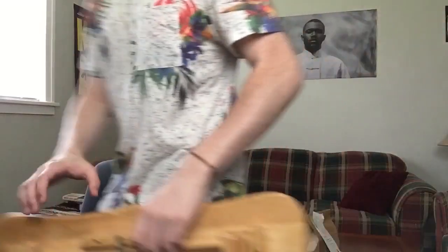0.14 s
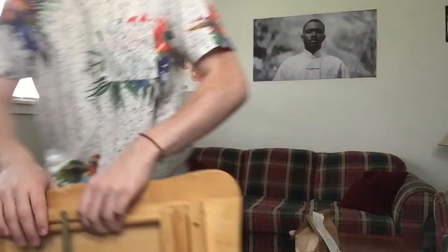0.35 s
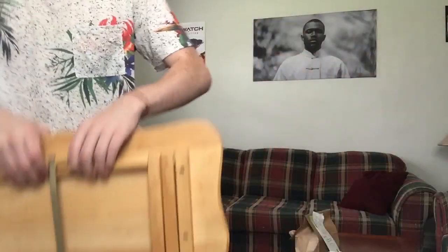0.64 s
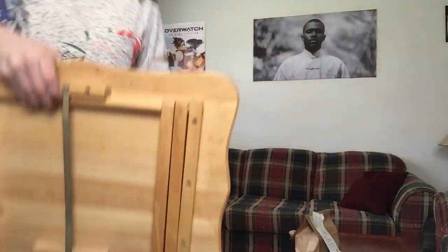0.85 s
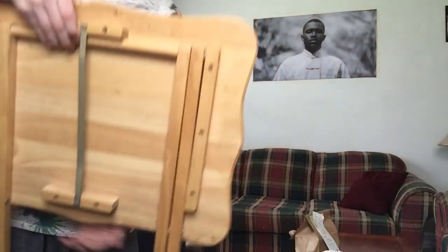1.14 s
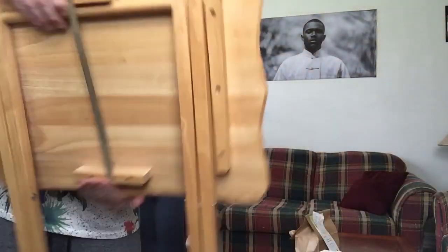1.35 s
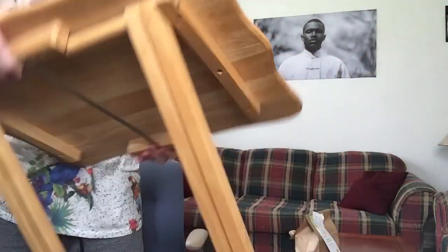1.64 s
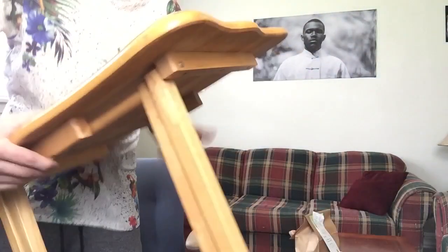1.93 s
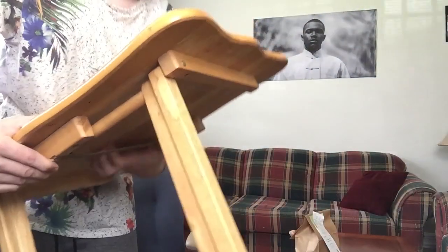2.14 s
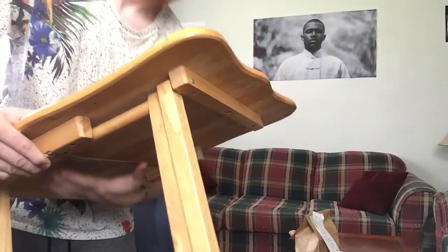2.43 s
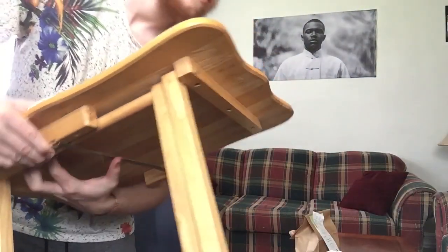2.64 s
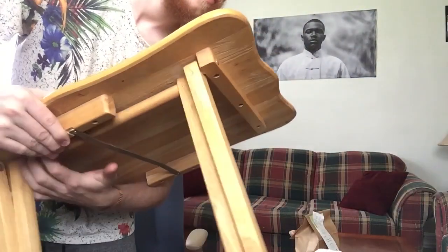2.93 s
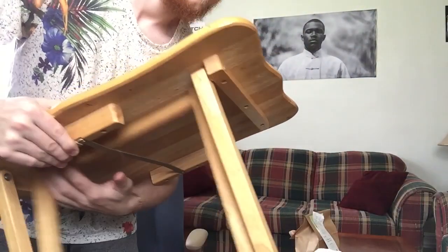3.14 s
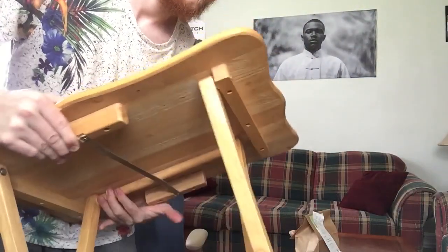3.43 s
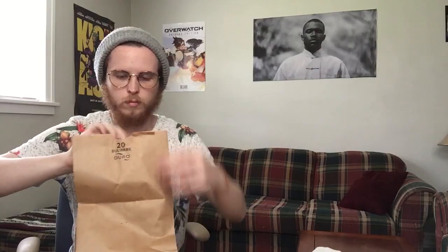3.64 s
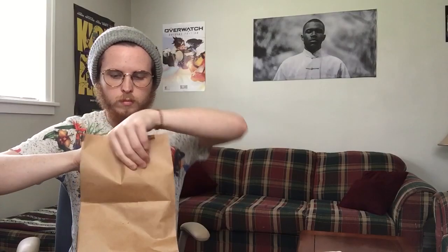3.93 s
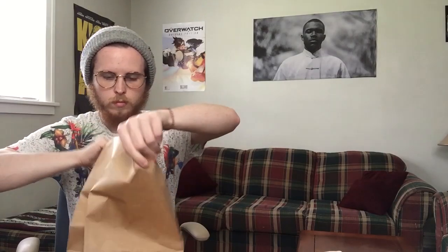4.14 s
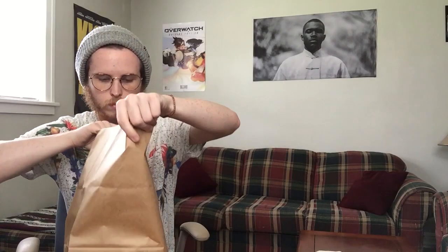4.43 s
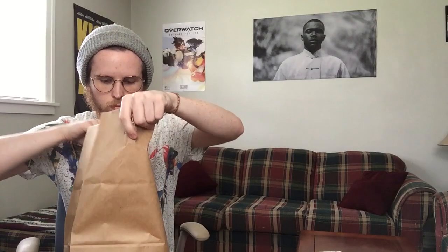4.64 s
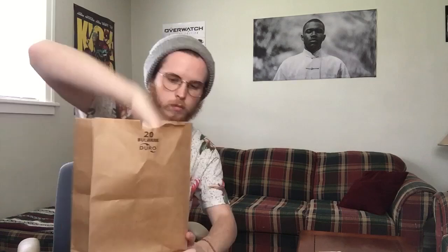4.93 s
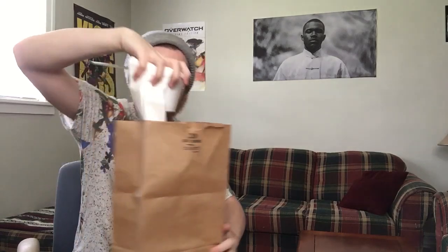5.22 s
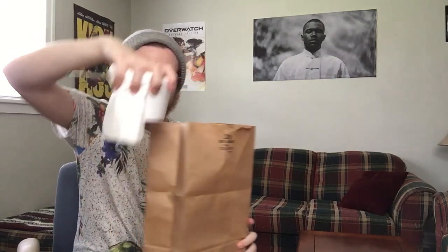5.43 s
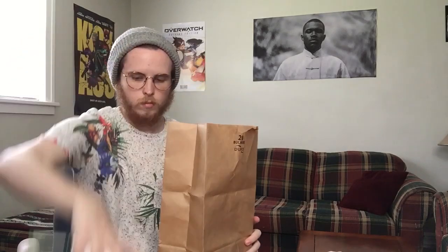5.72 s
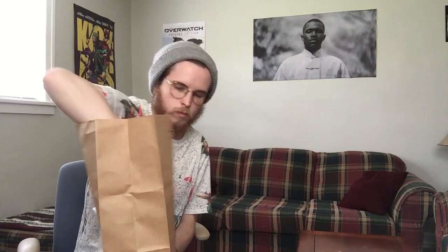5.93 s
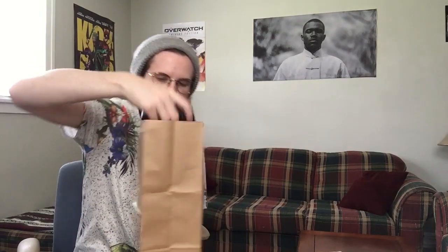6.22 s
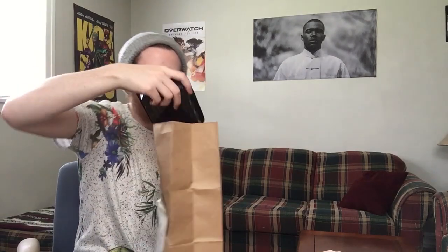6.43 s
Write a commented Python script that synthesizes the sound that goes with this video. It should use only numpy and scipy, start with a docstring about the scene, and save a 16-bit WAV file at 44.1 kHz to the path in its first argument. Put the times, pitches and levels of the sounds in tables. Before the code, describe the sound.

For the first second or so, a wooden folding table is lifted with soft knocks, dull bumps and a light rattle of loose legs. Its hinges give faint, short squeaks from about 1.4 to 3 seconds. The knocks then grow, with a brief rub of palms on wood, into a loud clatter that stops abruptly at 3.5 seconds. A paper bag takes over at once, rustling and then snapping and crinkling loudest between 4 and 4.4 seconds, with low thumps from inside. Softer crackles follow, and the rustle picks up again at 5 seconds. A box slides along the paper with a smooth hiss around 5.3 seconds. From 5.7 to about 6.5 seconds, boxes tap hollowly and slide amid more rummaging. Everything sounds close, in a small furnished room with a faint electrical hum and a low wash of air.

```python
"""A paper bag is pulled open and rummaged through: creases buckle and snap over a dense rustle,
while boxes slide, knock and bump inside. Before it, a wooden folding table is lifted and opened:
friction makes its hinges squeak, and impacts of the legs excite the modes of the top.
The clatter stops abruptly as the scene changes to the bag. Both sound in a small furnished room
with mains hum and a low murmur of air."""
import sys
import numpy as np
from scipy import signal
from scipy.io import wavfile

SR = 44100
rng = np.random.default_rng(int(sys.argv[2]) if len(sys.argv) > 2 else 0)


def bounce(signal):
    """Save signal as a 16-bit WAV file at the path given by the first command-line argument."""
    frames = np.transpose(np.atleast_2d(signal))
    limited = np.clip(frames, -1, 1)
    pcm = np.round(limited * 32767).astype(np.int16)
    wavfile.write(sys.argv[1], SR, pcm)


N = 290619

TABLE_SCENE = np.arange(N) < 3.527 * SR   # true for the table, false for the bag
EDGES = 25 * 2 ** np.arange(0, 9.6, .5)   # half-octave bands, Hz
CENTRES = np.sqrt(EDGES[1:] * EDGES[:-1])
BANK = [signal.butter(2, pair, "band", fs=SR, output="sos") for pair in zip(EDGES, EDGES[1:])]
OCTAVES_UP = np.log2(np.maximum(CENTRES, 500) / 1500)   # axis of spectral tilt, flat below 500 Hz

# normal modes of the table top: pitch_hz, gain_db, t60_s
TOP_MODES = [(286.6, 5, 0.11), (362, 11, 0.045), (423.5, 8, 0.073), (500, 2, 0.057), (562, 1.5, 0.093),
             (649, 11, 0.023), (700, -1.5, 0.16), (821, 6.5, 0.064), (1031, 9, 0.035), (1330, 20.5, 0.009),
             (2257, 16, 0.016), (3000, 8, 0.0075)]
# relative spectral density of crumpling paper: frequency_hz, level_db
PAPER_SPECTRUM = [(88, -28), (150, -2.5), (386, 6), (883, 3), (1380, 5.5), (2860, 0), (7210, -13),
                  (11000, -30), (15000, -28)]
# boxes striking bag and table: start_s, peak_db, pitch_hz, second_pitch_hz
BOX_TAPS = [(5.696, -14, 1660, 2860), (5.898, -21.5, 238, 500), (5.908, -18, 414, 706),
            (5.988, -20.5, 670, 1090), (6.012, -26.5, 470, 950), (6.125, -16, 687, 1930),
            (6.168, -29, 724, 2570), (6.321, -24, 1720, 2170), (6.378, -10.5, 2180, 730)]
# large creases giving way: start_s, peak_db, panel_pitch_hz
CREASES = [(3.558, -29, 2450), (3.659, -14.5, 2930), (3.765, -31, 2100), (3.863, -30.5, 620),
           (3.877, -31, 1330), (3.948, -27, 1780), (4.004, -17.5, 2470), (4.021, -19.5, 2830),
           (4.076, -6.5, 1700), (4.099, -5.5, 2870), (4.106, -13, 3000), (4.127, -12.5, 2670),
           (4.13, -10.5, 317), (4.151, -13, 6000), (4.176, -3.5, 1500), (4.243, -6.5, 3270),
           (4.249, -11, 3220), (4.321, -17, 7100), (4.334, -16, 3030), (4.393, -11, 1320),
           (4.402, -10, 1630), (4.564, -28.5, 1270), (4.602, -46, 1780), (4.704, -29, 673),
           (4.786, -39.5, 670), (4.841, -26, 685), (4.879, -31, 675), (4.894, -27, 655), (4.921, -35, 2360),
           (4.935, -25.5, 1860), (4.994, -24.5, 1520), (5.026, -22.5, 627), (5.082, -25, 1730),
           (5.154, -28.5, 753), (5.19, -20.5, 411), (5.833, -42, 1290), (5.961, -28, 2300),
           (6.102, -24.5, 1980), ]


def from_db(db):
    """Amplitude ratio of a level in decibels."""
    return np.exp(np.asarray(db) * np.log(10) / 20)


def rms_one(x):
    """Normalisation to unit rms."""
    return x / np.sqrt(np.mean(x ** 2) + 1e-20)


def per_band(points):
    """A spectrum interpolated at the band centres, in log frequency."""
    hz, db = np.transpose(points)
    return np.interp(np.log(CENTRES), np.log(hz), db)


def coloured(x, gains):
    """Filter-bank shaping; alternating signs let neighbouring bands add at their common edge."""
    return sum(g * (-1) ** k * signal.sosfilt(sos, x) for k, (g, sos) in enumerate(zip(gains, BANK)))


def drift(corner_hz):
    """Slow random modulation: low-passed noise of unit rms."""
    r = np.exp(-2 * np.pi * corner_hz * 40 / SR)
    slow = signal.lfilter([1], [1, -2 * r, r * r], rng.standard_normal(N // 40 + 2002))[2000:]
    return np.interp(np.arange(N) / 40, np.arange(len(slow)), rms_one(slow))


def ring(x, hz, t60):
    """Damped resonator: a unit impulse starts a decaying sine of unit amplitude."""
    r, w = from_db(-60 / (t60 * SR)), 2 * np.pi * hz / SR
    return signal.lfilter([0, np.sin(w)], [1, -2 * r * np.cos(w), r * r], x + 1e-18)


def grains(per_s, spread_db, clump_db):
    """Shot noise of unit rms: random impulses, uneven in size and modulated into clumps."""
    sizes = from_db(spread_db * np.minimum(rng.exponential(1, N), 5)) * rng.choice([-1, 1], N)
    return rms_one(sizes * (rng.random(N) < per_s / SR) * from_db(clump_db * drift(46.4)))


def hump(middle_s, length):
    """Gaussian envelope."""
    return np.exp(-(2 * (np.arange(N) / SR - middle_s) / length) ** 2)


def gesture(s, length, rise_s, fall_s, growth_db_per_s=0):
    """Envelope that reaches 1 at s, is sustained, then decays; rise and fall are times for 40 dB."""
    corners = s + np.array([-3 * rise_s, 0, length, length + 3 * fall_s])
    first, last = np.clip((corners[[0, -1]] * SR).astype(int), 0, N)
    gain, end_db = np.zeros(N), growth_db_per_s * length
    level_db = np.interp(np.arange(first, last) / SR, corners, [-120, 0, end_db, end_db - 120])
    gain[first:last] = from_db(level_db)
    return gain


def fading(blows, fade_s):
    """Envelope that jumps at each (start_s, level_db) and decays exponentially."""
    steps = np.zeros(N)
    for s, db in blows:
        steps[round(s * SR)] = from_db(db)
    return signal.lfilter([1], [1, -np.exp(-1 / (fade_s * SR))], steps + 1e-18)


def air():
    """Ambient noise: a broad spectrum whose bands waver, with a few narrow resonances."""
    # relative spectral density of the air: frequency_hz, level_db
    spectrum = [(24, -54), (40, -7), (113, -6.5), (169, -4.5), (373, -8), (560, -14), (1170, -8),
                (1260, -16), (2390, -13.5), (2850, -24.5), (6000, -31.5), (15000, -46)]
    # resonances in the room noise: pitch_hz, width_hz, level_db
    resonances = [(370, 81, -59), (975, 46, -68), (1173, 9, -70)]
    white = rng.standard_normal((2, N))
    waver_db = np.where(CENTRES < 600, 3.9, 1.5)
    murmur = sum(from_db(db + waver_db[k] * drift(4.8)) * signal.sosfilt(BANK[k], white[k % 2])
                 for k, db in enumerate(per_band(spectrum)))
    tones = sum(from_db(db) * rms_one(ring(white[0, ::-1], hz, 3.14 / width))
                for hz, width, db in resonances)
    return from_db(-57) * rms_one(murmur) + tones


def mains_hum(pitch_hz=120.5, level_db=-58.5):
    """A machine on the mains radiates a pure tone, slightly modulated in amplitude."""
    tone = np.sqrt(2) * np.sin(2 * np.pi * pitch_hz * np.arange(N) / SR)
    return from_db(level_db + 2.1 * drift(5.7)) * tone


def room(x, t60_s=0.37, reverb_db=-16, wall_cut_hz=7000):
    """Reverberation: diffuse reflections, dulled by the walls, follow the direct sound after 4 ms."""
    t = np.arange(SR // 2) / SR
    tail = rng.standard_normal(len(t)) * from_db(-60 * t / t60_s) * (t > .004)
    tail = signal.sosfilt(signal.butter(1, wall_cut_hz, fs=SR, output="sos"), tail)
    return x + from_db(reverb_db) * signal.fftconvolve(x, tail / np.sqrt(np.sum(tail ** 2)))[:N]


def bumps():
    """Soft impacts excite only low frequencies; the bag reaches deeper than the board."""
    # the table against the body, then the contents in the bag: start_s, level_db
    blows = [(0.041, -42.5), (0.173, -40), (0.518, -42), (0.621, -42.5), (1.162, -41.5), (4.105, -40),
             (4.179, -32), (4.399, -41.5), (4.998, -44.5), (5.894, -37), (6.127, -42)]
    white = rng.standard_normal(N)
    bands = (signal.butter(2, [low_hz, 240], "band", fs=SR, output="sos") for low_hz in (105, 45))
    board, bag = (rms_one(signal.sosfilt(band, white)) for band in bands)
    return fading(blows, fade_s=0.045) * np.where(TABLE_SCENE, board, bag)


def table_top(x):
    """Modal superposition: the top responds as a sum of damped resonators of alternating sign."""
    return sum(from_db(db) * ring(x, hz, t60) * (-1) ** k for k, (hz, db, t60) in enumerate(TOP_MODES))


def leg_rattle():
    """Forced vibration: many small impacts of the loose legs drive the top."""
    # jolts to the legs, the longest being the carrying: start_s, length_s, level_db
    jolts = [(0.0, 0.026, -33), (0.038, 0.18, -41), (0.525, 0.04, -31), (0.666, 1.7, -61),
             (2.12, 0.068, -37), (3.226, 0.033, -25), (3.34, 0.0059, -16.5), (3.398, 0.082, -15.5)]
    shaking = sum(from_db(db) * gesture(s, length, rise_s=0.11, fall_s=0.017) for s, length, db in jolts)
    impacts = signal.lfilter([.15], [1, -.85], grains(1000, spread_db=0.5, clump_db=4))
    return from_db(-13) * table_top(impacts * shaking) / np.std(table_top(impacts))


def palm_rubs(hiss):
    """Sliding friction: palms hiss as they move over the varnish."""
    # strokes of the palms: start_s, length_s, level_db
    strokes = [(0.524, 0.12, -64.5), (3.172, 0.099, -47.5), (3.323, 0.025, -41), (3.392, 0.062, -44)]
    return hiss * sum(from_db(db) * gesture(s, length, rise_s=0.099, fall_s=0.011)
                      for s, length, db in strokes)


def hinge_squeaks(grit, hiss):
    """Stick-slip friction: uneven slips excite one pitch per rub, and the pin colours the hiss."""
    # rubs in the hinges: middle_s, length_s, tone_db, pitch_hz, hiss_db
    rubs = [(0.794, 0.1, -63, 1650, -63.5), (1.42, 0.047, -46, 2240, -50.5), (2.137, 0.068, -48, 1850, -50),
            (2.248, 0.099, -43.5, 285, -65), (2.377, 0.092, -55, 1810, -66),
            (2.598, 0.095, -51.5, 1820, -65), (2.924, 0.031, -61, 3060, -54.5),
            (3.313, 0.0068, -39, 3530, -47), (3.408, 0.042, -61, 5150, -45)]
    pin_hiss = hiss + from_db(-8) * rms_one(ring(grit, hz=3700, t60=0.014))
    out, slips = np.zeros(N), grains(1500, spread_db=0, clump_db=0.5)
    for s, length, tone_db, hz, hiss_db in rubs:
        squeak = rms_one(ring(ring(slips, hz, 25 / hz), hz, 25 / hz))
        out += hump(s, length) * (from_db(tone_db) * squeak + from_db(hiss_db) * pin_hiss)
    return out


def knocks(chatter_s=0.0041, grip_detune=0.03, spot_db_per_octave=6):
    """Impact excitation: the spot struck weights the modes, the grip detunes them, hard contacts crack."""
    # blows on the table: start_s, peak_db, hardness (0 to 1), favoured_pitch_hz
    blows = [(0.038, -33, 0.23, 397), (0.176, -32, 0.28, 382), (0.519, -30, 0.18, 590),
             (0.553, -36.5, 0.4, 384), (0.616, -33.5, 0.37, 400), (1.171, -35.5, 0.33, 384),
             (3.029, -24.5, 0.04, 370), (3.241, -20, 0.06, 317), (3.308, -27.5, 0.5, 990),
             (3.327, -16.5, 0.03, 930), (3.337, -12.5, 0, 524), (3.407, -11.5, 0.03, 447),
             (3.43, -9.5, 0.2, 553), (3.443, -11, 0.07, 370), (3.471, -18.5, 0.05, 600),
             (3.496, -12.5, 0, 390), (3.512, -12.5, 0.04, 290)]
    out, size = np.zeros(N), 8192
    t = np.arange(size) / SR
    scatters = rng.standard_normal((len(blows), len(TOP_MODES)))
    for (s, db, hardness, spot_hz), scatter in zip(blows, scatters):
        noise = rng.standard_normal(size)
        softness = np.clip(1 - hardness, .02, .98) ** 0.65   # a softer contact is a longer push
        contact = (t == 0) + 0.11 * noise * np.exp(-t / chatter_s)
        force = signal.lfilter([1 - softness], [1, -softness], contact)
        body = np.zeros(size)
        for (hz, mode_db, t60), chance in zip(TOP_MODES, scatter):
            gain = from_db(mode_db + 0.87 * abs(chance) - spot_db_per_octave * abs(np.log2(hz / spot_hz)))
            body += np.sign(chance) * gain * ring(force, hz * (1 + grip_detune * chance), t60)
        crack = hardness * rms_one(signal.lfilter([1], [1, -.7], noise)) * np.exp(-t / 0.005)
        out[round(s * SR):][:size] += from_db(db) * (body / np.abs(body).max() + from_db(-11) * crack)
    return out


def folding_table():
    """Impacts and friction noise, high-passed because a small board radiates little bass."""
    rattle = leg_rattle()
    grit = grains(5000, spread_db=6, clump_db=1)
    friction_band = signal.butter(2, [1300, 4500], "band", fs=SR, output="sos")
    hiss = rms_one(signal.sosfilt(friction_band, grit) + from_db(-26) * np.diff(grit, prepend=0))
    vibration = rattle + knocks() + palm_rubs(hiss) + hinge_squeaks(grit, hiss)
    return signal.sosfilt(signal.butter(4, 235, "high", fs=SR, output="sos"), vibration)


def box_slides():
    """Sliding friction: boxes moving along the paper give a smooth, bright hiss."""
    # boxes sliding out: middle_s, length_s, level_db
    slides = [(4.295, 0.32, -41.5), (5.326, 0.45, -42), (6.27, 0.51, -47.5)]
    hiss = rms_one(coloured(rng.standard_normal(N), from_db(per_band(PAPER_SPECTRUM) + 7.8 * OCTAVES_UP)))
    return hiss * sum(from_db(db) * hump(s, length) for s, length, db in slides)


def box_taps(t60_cycles=17, crack_s=0.0017, crack_db=-5):
    """Impulse response of a box: two hollow resonances swell and decay under a dry crack."""
    out, size = np.zeros(N), 4096
    t = np.arange(size) / SR
    impulse = 1. * (t == 0)
    crack_gains = from_db(per_band(PAPER_SPECTRUM) + 1.5 * OCTAVES_UP)
    for s, db, *pitches in BOX_TAPS:
        hollow = sum(rms_one(ring(ring(impulse, hz, t60_cycles / hz), hz, t60_cycles / hz / 2))
                     for hz in pitches)
        crack = rms_one(coloured(rng.standard_normal(size) * np.exp(-t / crack_s), crack_gains))
        tap = hollow + from_db(crack_db) * crack
        out[round(s * SR):][:size] += from_db(db) * tap / np.abs(tap).max()
    return out


def paper_rustle(cut_s=4.991, wake_db=-19.5, wake_s=0.024):
    """Crackling noise: countless small creases buckle, some exciting paper panels of many sizes."""
    # grips on the bag: start_s, length_s, level_db, tilt_db_per_octave
    grips = [(3.476, 0.11, -34, 2.5), (3.986, 0.041, -37.5, 4), (4.096, 0.013, -24.5, 0.5),
             (4.176, 0.059, -28.5, -1), (4.228, 0.012, -39.5, 1), (4.387, 0.037, -26.5, 1),
             (4.495, 0.18, -51, 4), (4.762, 0.11, -46, 5.5), (4.912, 0.038, -37, 0),
             (4.983, 0.06, -34.5, 2), (5.1, 0.16, -46, 1.5), (5.352, 0.38, -53, 7),
             (5.891, 0.019, -43.5, 6.5), (5.952, 0.35, -39.5, 1.5), (6.368, 0.067, -44.5, 5.5),
             (6.513, 0.1, -53, 7.5)]
    starts, _, _, tilts = np.transpose(grips)
    envelopes = np.array([from_db(db) * gesture(s, length, rise_s=0.075, fall_s=0.16, growth_db_per_s=1)
                          for s, length, db, _ in grips])
    # the sound cuts abruptly into louder rustling
    envelopes[np.argmin(np.abs(starts - cut_s)), :round(cut_s * SR)] = 0
    handling = envelopes.sum(axis=0) + 1e-9
    # each snap or tap sets off a wake of smaller creases
    level = handling + fading([(s, db + wake_db) for s, db, *_ in CREASES + BOX_TAPS], wake_s)
    tilt = tilts @ envelopes / handling + 0.2276 * (20 * np.log10(level) + 31.5)   # louder is brighter
    clicks = grains(9000, spread_db=3.8, clump_db=3.2)
    pops, panel_of_pop = grains(600, spread_db=3.2, clump_db=3.5), rng.integers(0, 16, N)
    panels = sum(np.sqrt(hz) * ring(pops * (panel_of_pop == k), hz, 31.6 / hz)
                 for k, hz in enumerate(np.geomspace(330, 7000, 16)))
    crinkle = clicks + from_db(-8) * rms_one(panels)
    paper_db = per_band(PAPER_SPECTRUM)
    gains = (level * from_db(db + tilt * up) for db, up in zip(paper_db, OCTAVES_UP))
    return coloured(crinkle, gains) / np.std(coloured(crinkle, from_db(paper_db)))


def crease_snaps(buckle_s=0.001, buckle_cycles=2, panel_t60_cycles=17):
    """Buckling: a crease gives way in a burst of a few ms and briefly rings the nearest panel."""
    out, size = np.zeros(N), 2048
    t = np.arange(size) / SR
    bass_cut = signal.butter(2, 220, "high", fs=SR, output="sos")   # a crease is too small for bass
    for (s, db, hz), noise in zip(CREASES, rng.standard_normal((len(CREASES), size))):
        tilt = 9.5 + 0.31 * db   # dB per octave: louder is brighter
        focus_db = 0.32 * db * np.abs(np.log2(CENTRES / hz))   # softer creases keep near the panel pitch
        scatter_db = 1.5 * rng.standard_normal(len(BANK))
        gains = from_db(per_band(PAPER_SPECTRUM) + tilt * OCTAVES_UP + focus_db + scatter_db)
        onset = from_db(11) * noise * np.exp(-t / 0.0013)
        buckle = noise * np.exp(-t / (buckle_s + buckle_cycles / hz)) * (1 - np.exp(-t / 0.0015))
        crack = rms_one(coloured(onset + buckle, gains))
        panel = rms_one(ring(buckle, hz, panel_t60_cycles / hz))
        snap = signal.sosfilt(bass_cut, crack + from_db(-0.5) * panel)
        out[round(s * SR):][:size] += from_db(db) * snap / np.abs(snap).max()
    return out


def scene():
    """Superposition: first the table, then the bag, over continuous air and hum."""
    table = room(folding_table())
    bag = room(paper_rustle() + box_slides() + crease_snaps() + box_taps())
    return (np.where(TABLE_SCENE, table, bag) + bumps() + air() + mains_hum())[None]


def record(dry):
    """Soft saturation and band limiting: the microphone rounds peaks, losing deep bass and top treble."""
    bass_cut = signal.butter(2, 55, "high", fs=SR, output="sos")
    treble_cut = signal.cheby2(12, 60, 16400, fs=SR, output="sos")
    return signal.sosfilt(treble_cut, signal.sosfilt(bass_cut, np.tanh(dry)))


dry = scene()
out = record(dry)
bounce(out)
```